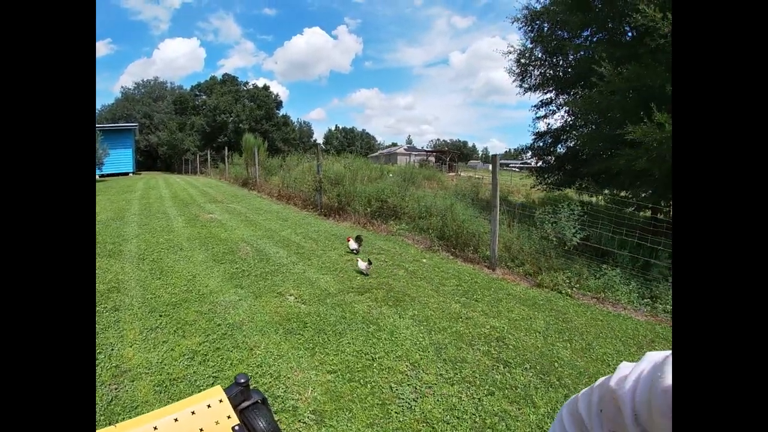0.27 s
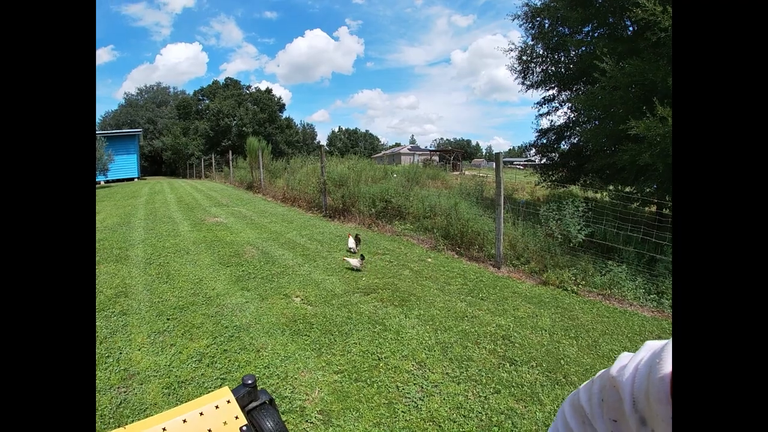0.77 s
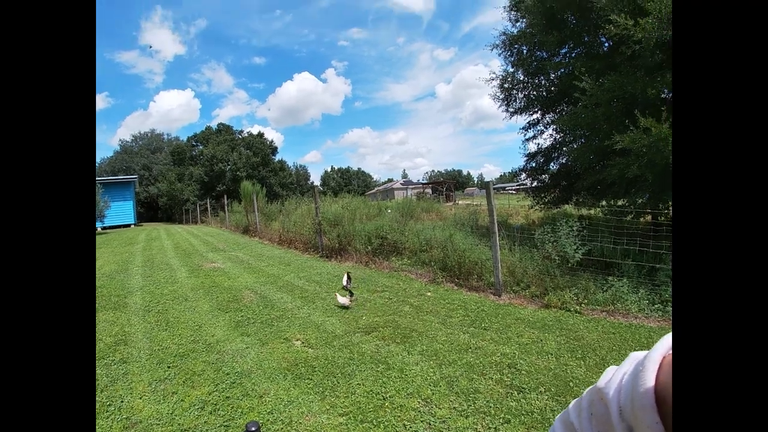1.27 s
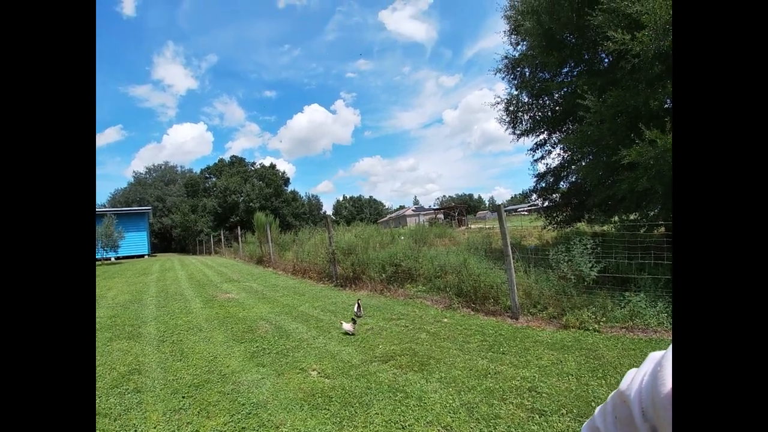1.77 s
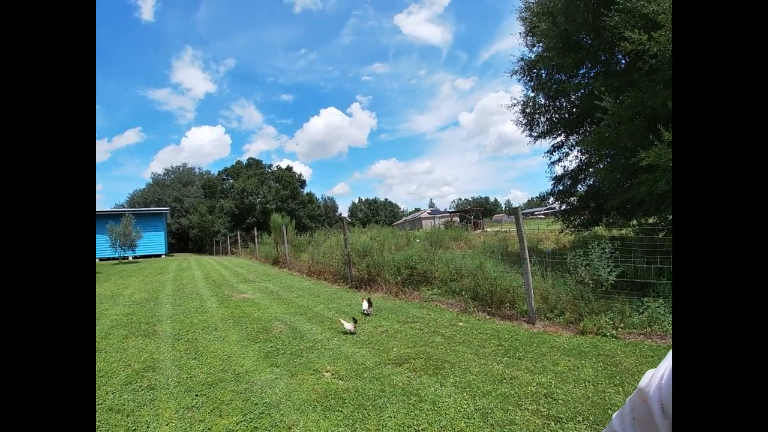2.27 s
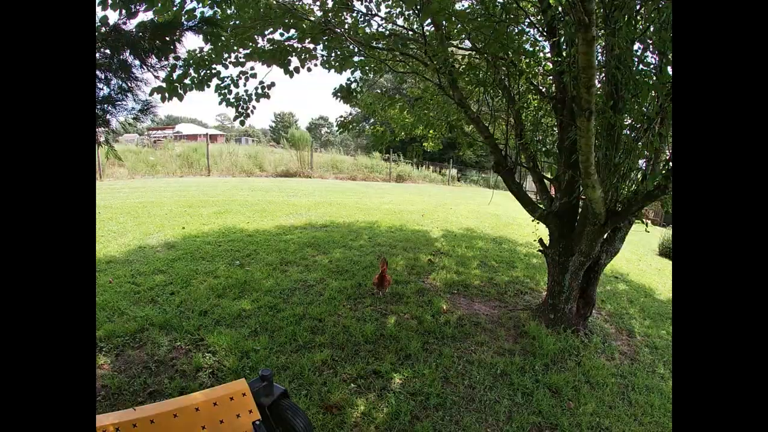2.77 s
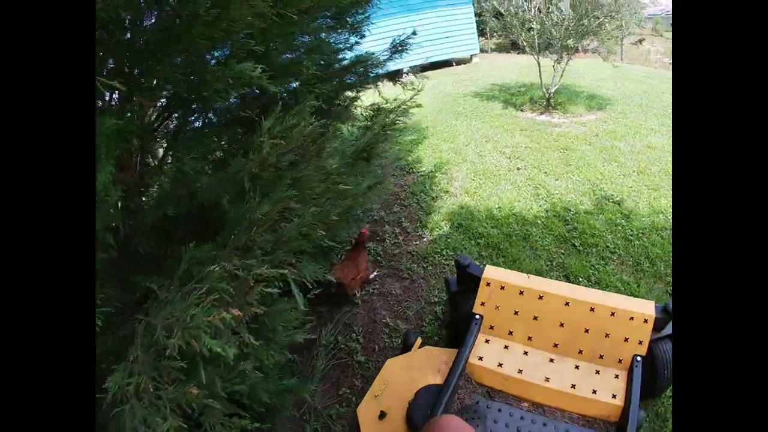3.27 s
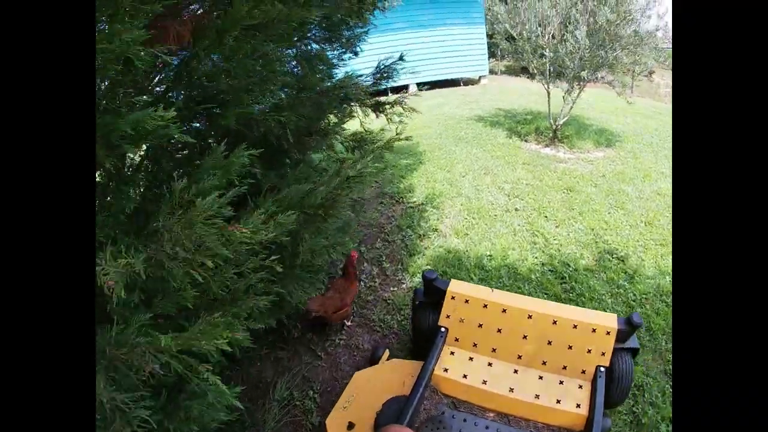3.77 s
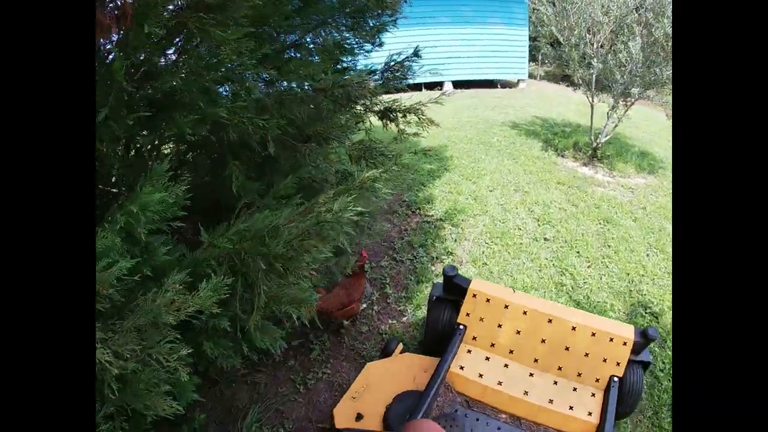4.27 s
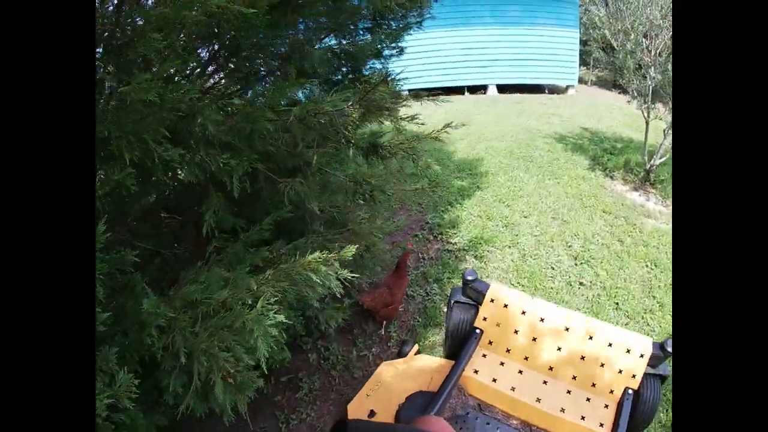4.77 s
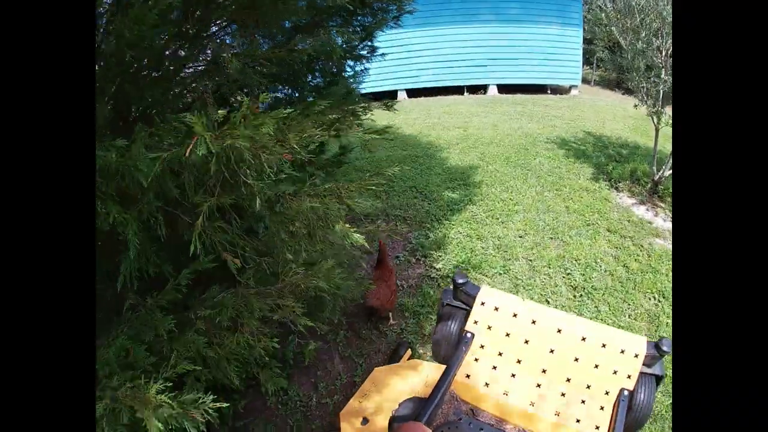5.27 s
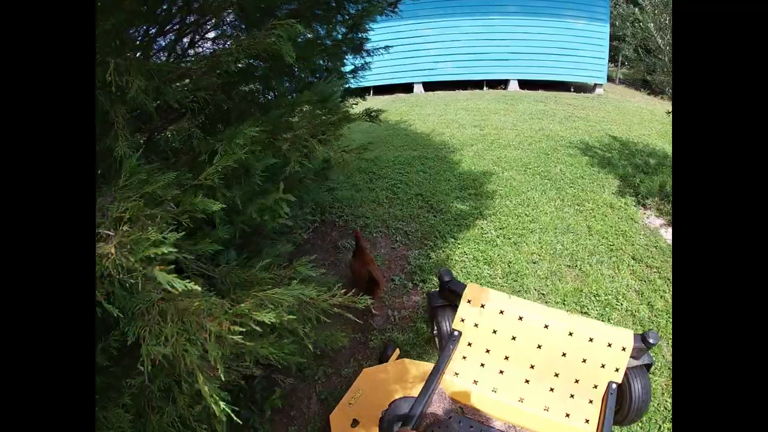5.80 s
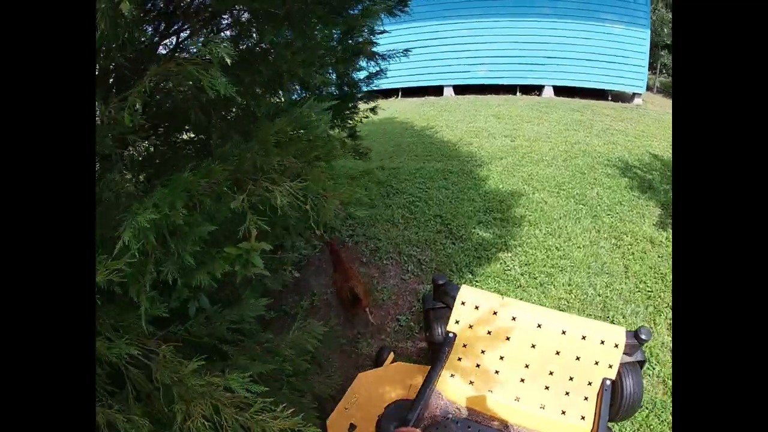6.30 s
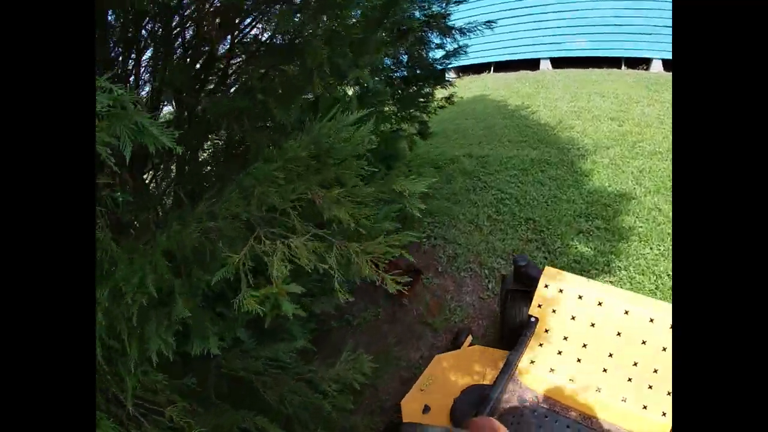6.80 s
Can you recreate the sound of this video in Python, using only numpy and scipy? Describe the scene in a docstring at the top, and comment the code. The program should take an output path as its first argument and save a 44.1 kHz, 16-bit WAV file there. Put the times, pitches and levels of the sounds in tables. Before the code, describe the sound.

A riding lawn mower drones steadily as it cuts grass, heard up close, its engine throbbing and a metal plate rattling.

```python
"""On a lawn, one microphone at the seat of a zero-turn riding mower, close to deck and engine. The V-twin
engine throbs and, through a belt, spins the blades, which drone in the steel deck, churn the air and shred
grass. The hydraulic drive hums and a loose footplate rattles. Three stretches are heard one after another; the
sound drops out briefly between them."""
import sys
import numpy as np
from scipy import signal
from scipy.fft import rfft, irfft, next_fast_len
from scipy.io import wavfile
from scipy.ndimage import map_coordinates

SR = 44100
rng = np.random.default_rng(int(sys.argv[2]) if len(sys.argv) > 2 else 0)


def inscribe(sig):
    """Save sig as 16-bit PCM at rate SR to the path in sys.argv[1].

    A 1-D sig is mono; a 2-D sig holds one channel per row.
    Samples are clipped to [-1, 1] before scaling.
    """
    pcm = np.round(np.clip(np.atleast_2d(sig).T, -1, 1) * 32767)
    wavfile.write(sys.argv[1], SR, pcm.astype(np.int16))


N = 310443
TIME = np.arange(N) / SR

# how hard the deck works against its usual effort: t/s, load/dB
DECK_LOAD = [(0, 1), (0.4, 1.5), (1.3, 0), (2.5, -0.4), (3.2, -0.5), (4.3, -0.3), (5.3, 0.2), (5.55, -1.6),
             (6.1, 0), (7.04, 1.5)]
# dB of roar, rasp and cutting hiss for each dB of load
ROAR_GROWS, RASP_GROWS, HISS_GROWS = 0.23, 1.3, 0.55


def blades(turns, pass_index):
    """Blade tips sweep past the deck walls; the belt slips a little, so the two blades beat."""
    # weaker blade tones: multiple of spindle speed, level/dB in pass 1, 2, 3
    weak_orders = [(1, -55, -65, -43), (2, -23, -34, -26), (3, -26, -32, -29), (5, -31, -43, -28),
                   (8, -34, -37, -31), (10, -36, -55, -43), (12, -47, -44, -45), (14, -42, -50, -48),
                   (16, -44, -49, -47)]
    # the deck's main hum, 4th order of the spindle: t/s, relative level/dB
    hum_levels = [(0, -14), (0.4, -14.5), (2.53, -16), (2.65, -31.5), (3.1, -19.5), (3.7, -18.5),
                  (3.9, -25.5), (4.15, -18.5), (5.05, -20), (5.3, -13.5), (5.7, -22), (6.02, -14.5),
                  (6.35, -30.6), (6.6, -19.5), (7.04, -34)]
    # the deck's howl, 6th order: t/s, relative level/dB
    howl_levels = [(0, -26.5), (1.3, -34.5), (2.75, -31), (3.0, -14.5), (3.22, -16), (3.5, -28),
                   (5.5, -23.5), (7.04, -30.5)]
    slip_turns_per_s, second_blade_db = 0.5, -8
    dragged = turns + 0.005 * wobble(5)
    weak = amp(wobble(2.9)) * sum(amp(db) * tone(dragged, k) for k, db in of_pass(weak_orders, pass_index))
    hum = amp(curve(hum_levels) + 0.24 + 0.47 * wobble(7)) * tone(dragged, 4)
    stirred = turns + 0.012 * wobble(14)  # turbulence under the deck stirs the howl
    lagging = stirred - slip_turns_per_s * TIME
    pair = tone(stirred, 6) + amp(second_blade_db) * tone(lagging, 6)
    howl = amp(curve(howl_levels) - 1) * unit(pair)
    return weak + hum + howl


def engine(cycles, pass_index):
    """Exhaust tones; no two firings are quite alike in timing or strength."""
    # exhaust tones: multiple of the four-stroke cycle rate, level/dB in pass 1, 2, 3
    orders = [(1, -38, -58, -37), (2, -26, -40, -27), (3, -32, -39, -32), (4, -42, -48, -31),
              (5, -25, -35, -23), (6, -33, -33, -28), (7, -35, -39, -34), (8, -31, -35, -27),
              (10, -38, -44, -32), (11, -40, -55, -34), (14, -36, -46, -39), (15, -44, -50, -37),
              (16, -34, -36, -34), (17, -49, -52, -39), (18, -46, -50, -39), (19, -50, -47, -30),
              (20, -47, -50, -39), (21, -38, -38, -32), (22, -46, -50, -43), (23, -42, -46, -44),
              (24, -42, -35, -46), (26, -50, -46, -48), (27, -58, -52, -42), (32, -51, -52, -48)]
    uneven = cycles + 0.0015 * wobble(22)
    flutter = amp(0.5 * wobble(25))
    return flutter * sum(amp(db) * tone(uneven, k) for k, db in of_pass(orders, pass_index))


def churned_air(turns, cycles, pass_index, roar_hz=800, hiss_hz=3600):
    """Turbulence that pulses with each blade sweep and each firing, and grows with the load."""
    # air churned by the deck and cooling fan: f/Hz, spectral level/dB in pass 1, 2, 3
    spectrum = [(35, -60, -76, -59), (72, -56.5, -70.5, -54), (122, -49, -53, -46),
                (169, -45, -39.5, -43.5), (245, -47.5, -49.5, -46.5), (290, -45, -51, -41.5),
                (427, -49, -54, -49.5), (580, -56, -54, -52), (700, -53.5, -57, -50.5),
                (778, -57.5, -55.5, -56.5), (1240, -61.5, -59.5, -65), (2270, -76, -74, -75.5),
                (4260, -85, -85, -85.5), (5900, -91.5, -83.5, -87), (7540, -100, -98, -99),
                (10300, -106, -107, -107), (12600, -101, -107, -103), (14200, -113, -130, -120)]
    load_db = curve(DECK_LOAD)
    sweep = tone(turns, 1) + tone(turns, 2)
    firing = tone(cycles, 1) + tone(cycles, 2) + tone(cycles, 3)
    pulsing = unit(np.exp(0.04 * (sweep + firing)) * rng.standard_normal(N))
    rush = coloured(pulsing * np.sqrt(SR / 2), of_pass(spectrum, pass_index))
    roar = below(rush, roar_hz)
    hiss = rush - below(rush, hiss_hz)
    rasp = rush - roar - hiss
    lower = roar * amp(ROAR_GROWS * load_db + 0.58 * wobble(6))
    upper = rasp * amp(RASP_GROWS * load_db) + hiss * amp(HISS_GROWS * load_db)
    return lower + upper * amp(0.6 * wobble(13))  # flutters as the grass feeds in unevenly


def hydraulic_pump(turns, pass_index):
    """The hydraulic drive hums and whines at fixed ratios to the spindle."""
    # hum and whine: multiple of spindle speed, level/dB in pass 1, 2, 3
    ratios = [(2.59, -34, -46, -40), (13.62, -56, -56, -39)]
    return sum(amp(db) * tone(ratio * turns, 1) for ratio, db in of_pass(ratios, pass_index))


def footplate(contacts_per_s, spread_db):
    """The loose steel plate chatters on its mounts, harder on each bump; every contact rings it anew."""
    # plate modes: f/Hz, relative level/dB, t60/s
    modes = [(1475, -1, 0.032), (1648, 0, 0.036), (1956, -4.5, 0.039), (2825, -3.5, 0.022)]
    bumps_per_s, bump_db = 4, 2.2
    contacts = rng.random(N) < contacts_per_s / SR
    t = TIME[:SR // 10]
    ring = np.zeros(N)
    for hz, db, t60 in modes:
        blows = contacts * amp(spread_db * rng.uniform(-1.3, 1, N))
        mode = amp(db - 60 * t / t60) * np.sin(2 * np.pi * hz * t)
        ring += signal.oaconvolve(blows, mode)[:N]
    return amp(bump_db * wobble(bumps_per_s)) * unit(ring)


def clippings(stalks_per_s, level_db, spread_db):
    """Stalks patter against the steel deck; now and then a twig snaps."""
    # twigs and coarse tufts hitting the deck: t/s, level/dB, time to fall 30 dB/s
    twigs = [(.58, -47, 0.069), (0.683, -47, 0.038), (1.542, -44.5, .04), (2.232, -44, 0.037),
             (3.482, -44.5, 0.092), (4.43, -49, .15), (4.739, -53.5, 0.037), (5.3, -46, 0.16)]
    # colour of the patter and snaps: f/Hz, relative level/dB
    hit_spectrum = [(400, -33.5), (1500, -5), (3500, -0.5), (6000, -2), (9000, -17), (13000, -22.5),
                    (16000, -50)]
    hits = rng.random(N) < stalks_per_s / SR
    sizes = amp(spread_db * np.minimum(rng.exponential(size=N), 4)) * rng.choice([-1, 1], N)
    patter = amp(level_db + HISS_GROWS * curve(DECK_LOAD)) * unit(coloured(hits * sizes, hit_spectrum))
    snaps = sum((TIME >= at) * amp(db - 30 * np.abs(TIME - at) / fall_s) for at, db, fall_s in twigs)
    return patter + snaps * unit(coloured(rng.standard_normal(N), hit_spectrum))


def panels(x, pass_index):
    """The deck and engine shroud ring in a few broad resonances."""
    # sheet-metal resonances: f/Hz, width/Hz, boost/dB in pass 1, 2, 3
    resonances = [(1570, 350, -1.4, 0.5, 5.7), (1960, 110, 2, 1.5, 2.3), (2810, 760, 0.5, 2.9, 4.65),
                  (5520, 760, 7, 3.7, 3), (9360, 370, 4, 1, 2.4)]
    return filtered(x, lambda hz: amp(sum(
        boost_db[pass_index] / (1 + (2 * (hz - centre) / width) ** 2)
        for centre, width, *boost_db in resonances)))


def reflections(x, strength, count):
    """Weak, close echoes from the frame and seat ripple the treble, changing as the rider sways."""
    delays_s = rng.uniform(0.002, 0.014, count)
    echoes = sum(wobble(0.96) * np.roll(x, round(d * SR)) for d in delays_s) / np.sqrt(count)
    return x + strength * (echoes - below(echoes, 1000))


def pass_gate(start, end, rise_s=0.032, stop_s=0.00007, tail_s=0.025, tail_db=-25):
    """Each stretch of sound swells in quickly and cuts out abruptly, leaving a faint, short tail."""
    swell = np.clip((TIME - start) / rise_s, 0, 1) ** 2
    stop = np.clip((end - TIME) / stop_s, 0, 1)
    tail = amp(tail_db) * np.clip((end - TIME) / tail_s + 1, 0, 1) ** 2
    return swell * np.maximum(stop, tail)


def amp(db):
    """Decibels to gain."""
    return 10 ** (np.asarray(db) / 20)


def unit(x):
    """x at rms 1."""
    return x / np.sqrt(np.mean(x ** 2) + 1e-20)


def curve(points):
    """(t/s, value) points joined into one value per sample."""
    return np.interp(TIME, *np.transpose(points))


def of_pass(table, pass_index):
    """The first column of a table, paired with one pass's levels."""
    return np.asarray(table, float)[:, [0, pass_index + 1]]


def wobble(knots_per_s):
    """A smooth random curve around zero."""
    coarse = TIME[::64]
    knots = rng.standard_normal(int(TIME[-1] * knots_per_s) + 4)
    return np.interp(TIME, coarse, map_coordinates(knots, [coarse * knots_per_s]))


def tone(turns, order):
    """One whole multiple of a shaft's rotation, at rms 1 and a random phase."""
    return 2 ** 0.5 * np.sin(2 * np.pi * (round(order) * turns + rng.random()))


def filtered(x, response):
    """x through a gain that depends on frequency."""
    size = next_fast_len(N + SR // 4)
    return irfft(rfft(x, size) * response(np.fft.rfftfreq(size, 1 / SR)), size)[:N]


def coloured(x, points):
    """x shaped by (f/Hz, level/dB) points on a log axis."""
    f, db = np.transpose(points)
    return filtered(x, lambda hz: amp(np.interp(np.log(hz + 1), np.log(f), db)))


def below(x, hz):
    """The part of x under a frequency."""
    return signal.sosfiltfilt(signal.butter(2, hz, fs=SR, output="sos"), x)


def scene():
    """The mower from the seat: blades, engine and pump keep in step through the pulley ratios."""
    # the three stretches of sound: start/s, end/s
    passes = [(-.05, 2.537), (2.583, 2.921), (2.98, 7.1)]
    # governed spindle speed, sagging in thick grass: t/s, rotation rate/Hz
    spindle_speed = [(0, 47.47), (2.1, 48.14), (2.92, 47.9), (3.0, 46.4), (3.7, 46.25), (4.45, 46.46),
                     (5.3, 45.88), (5.75, 45.37), (6.75, 46.29), (7.04, 46.49)]
    # footplate shake, slight on smooth lawn and hard on bare ground: level/dB in pass 1, 2, 3
    shake_db = [-52.5, -52, -45.5]
    turns = np.cumsum(curve(spindle_speed)) / SR
    cycles = 0.582 * turns  # four-stroke cycles of the engine
    grass = clippings(stalks_per_s=180, level_db=-59, spread_db=3)
    plate = footplate(contacts_per_s=65, spread_db=4.5)
    tones, rush = np.zeros((2, N))
    for index, (start, end) in enumerate(passes):
        gate = pass_gate(start, end)
        tones += gate * (engine(cycles, index) + blades(turns, index) + hydraulic_pump(turns, index))
        air = churned_air(turns, cycles, index)
        rush += gate * (panels(air + grass, index) + amp(shake_db[index]) * plate)
    return (tones + reflections(rush, strength=0.22, count=6))[None]


def record(dry):
    """The mono microphone chain rounds off the highest peaks and keeps nothing above its band limit."""
    ceiling, top_hz = 0.78, 14200
    rounded = dry[0] / (1 + np.abs(dry[0] / ceiling) ** 8) ** (1 / 8)
    return filtered(rounded, lambda hz: hz < top_hz)[None]


dry = scene()
out = record(dry)
inscribe(out)
```